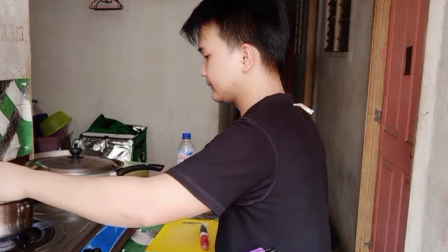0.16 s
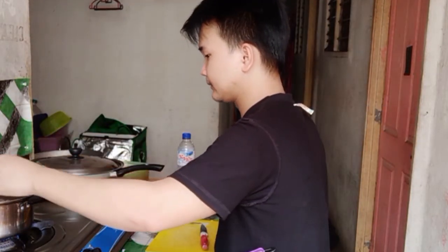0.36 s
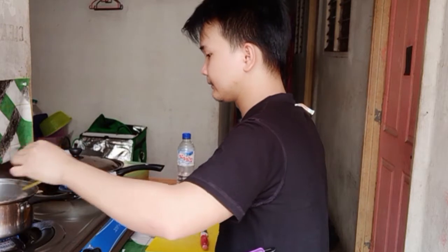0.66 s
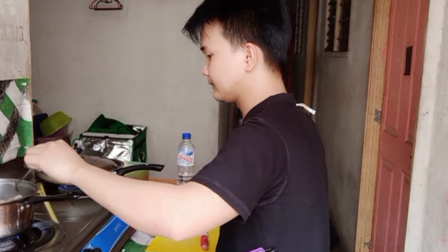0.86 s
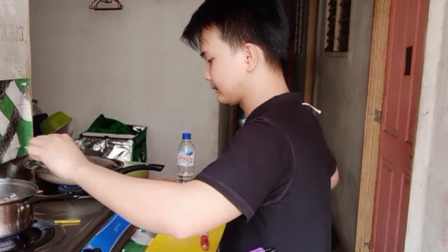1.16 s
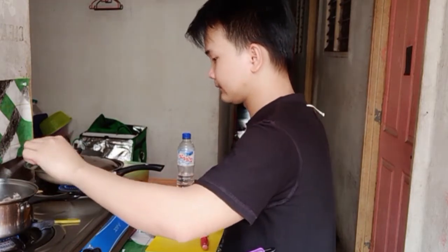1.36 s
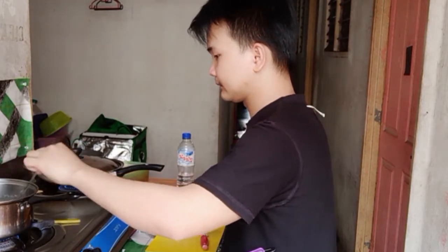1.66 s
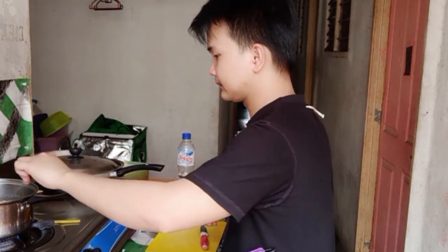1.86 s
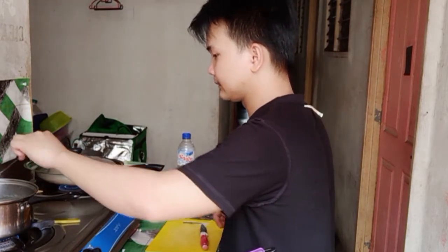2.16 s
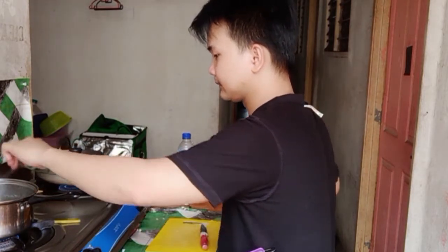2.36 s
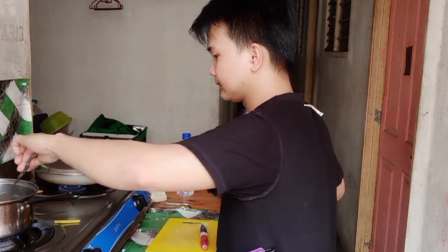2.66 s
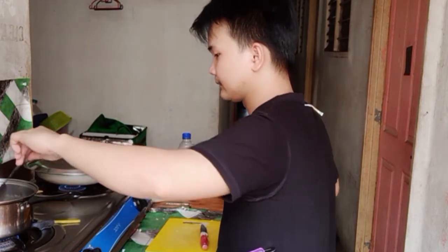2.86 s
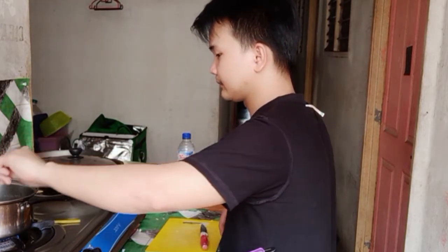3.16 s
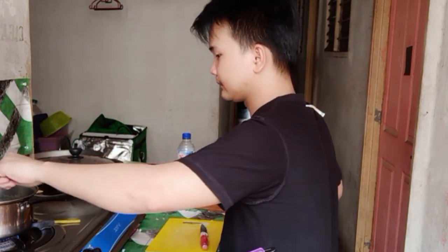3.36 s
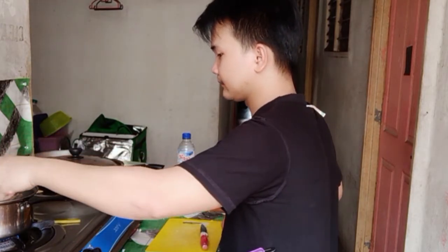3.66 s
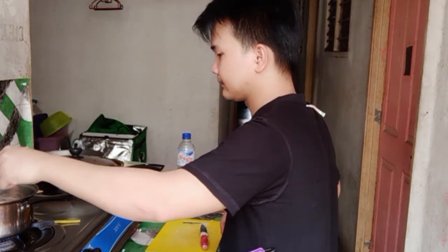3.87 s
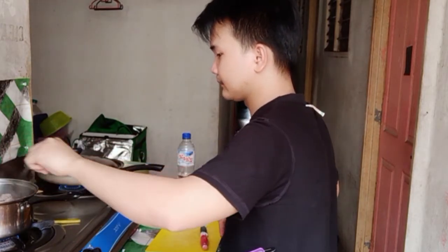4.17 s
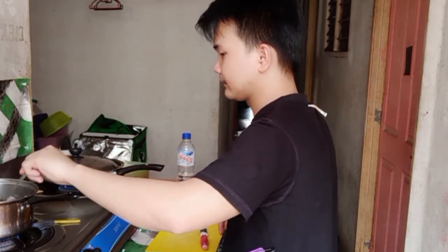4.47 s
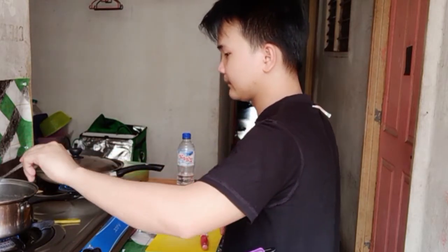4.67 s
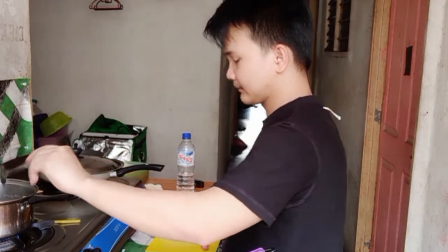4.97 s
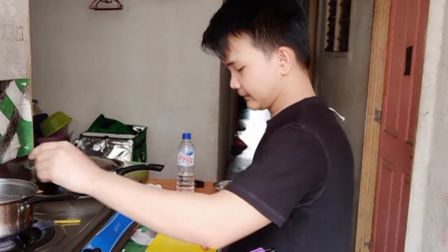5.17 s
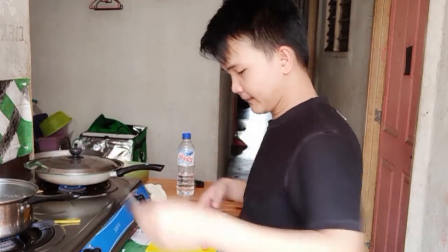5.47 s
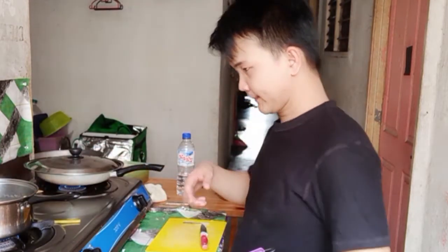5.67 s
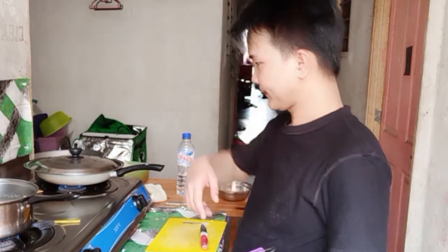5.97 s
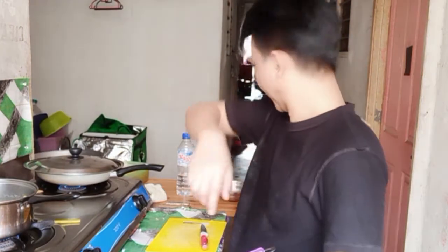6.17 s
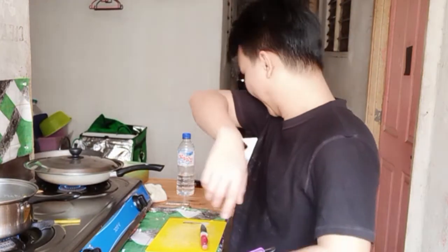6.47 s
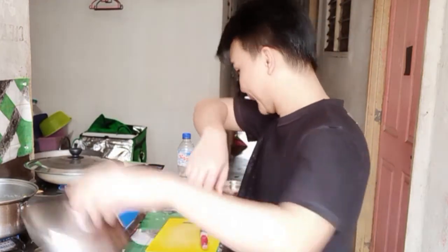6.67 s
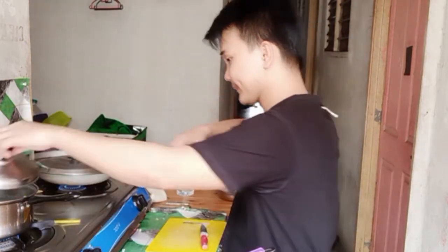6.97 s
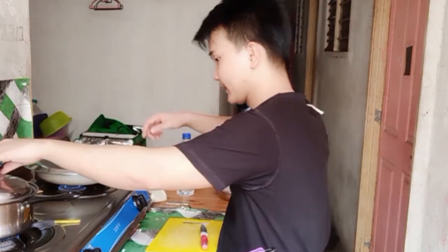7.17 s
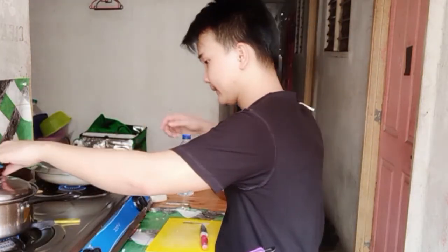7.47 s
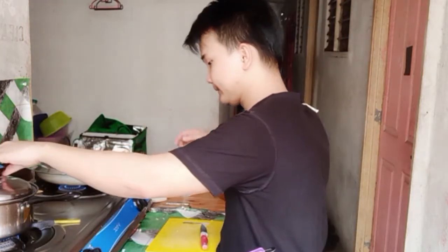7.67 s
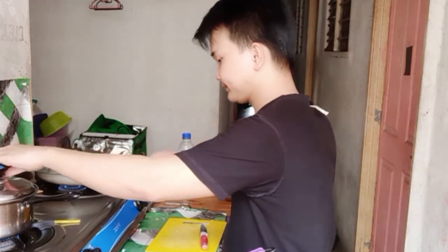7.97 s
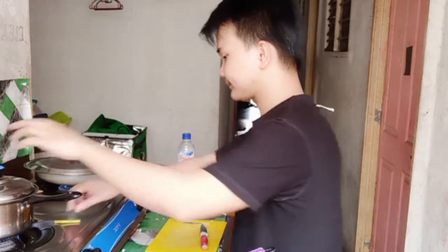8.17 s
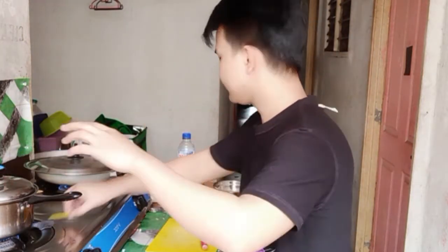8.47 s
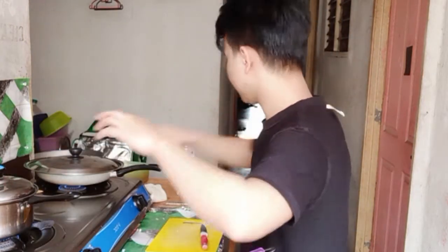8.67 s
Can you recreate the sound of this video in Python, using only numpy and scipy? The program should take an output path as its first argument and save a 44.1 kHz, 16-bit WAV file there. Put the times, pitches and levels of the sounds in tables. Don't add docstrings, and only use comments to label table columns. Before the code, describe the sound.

A thin, high simmering hiss runs throughout, swelling slightly with stirring, above low room noise and a faint breathy burner tone that comes and goes. Small ticks and barely audible footfalls open the scene, with a clearer tick at 0.7 s. Steel tongs clink at 2.0 s with softer touches after. A pot rim is knocked at 2.85 s, scraped hard at 3.0 s, and rattles to rest by 3.25 s. A quiet stretch holds a tick at 4.0 s and a tiny squeak. At 5.35 s a metal bowl lands, then clangs and rebounds loudly from 5.43 to 5.65 s, followed by a faint shelf hum. Footfalls grow firmer. At 6.9 s a lid touches, rocks hollowly and slides; a soft rub follows, then it drops shut at 7.5 s with a pot thud. A last nudge thuds at 8.0 s; simmering continues. The small, hard room is heard through a noise-suppressing mono phone, tails cut short.

```python
import sys
import numpy as np
from scipy import signal
from scipy.fft import rfft, irfft, next_fast_len
from scipy.io import wavfile
from scipy.ndimage import uniform_filter1d

SR = 44100
rng = np.random.default_rng(int(sys.argv[2]) if len(sys.argv) > 2 else 0)


def wrap_up_sound(samples):
    columns = np.atleast_2d(samples).T
    tamed = np.clip(columns, -1, 1)
    steps = np.round(tamed * 32767).astype(np.int16)
    wavfile.write(sys.argv[1], SR, steps)


def natural_amplitude(level_db):
    exponent = np.asarray(level_db, float) / 20
    return 10 ** exponent


N = 389403


def level(x, db):
    return x * natural_amplitude(db) / np.sqrt(np.mean(x ** 2))


def colour(x, points):
    hz, db = np.transpose(points)
    n = next_fast_len(len(x))
    f = np.log(np.fft.rfftfreq(n, 1 / SR) + 1)
    outside = np.maximum(np.log(hz[0]) - f, 0) + np.maximum(f - np.log(hz[-1]), 0)
    gain = natural_amplitude(np.interp(f, np.log(hz), db) - 40 * outside)
    return irfft(rfft(x, n) * gain, n)[:len(x)]


def band(hz, width):
    n = next_fast_len(N)
    f = np.fft.rfftfreq(n, 1 / SR)
    resonance = 1 / (1 + ((f - hz) / (width / 2)) ** 2)
    return level(irfft(rfft(rng.standard_normal(n)) * resonance, n)[:N], 0)


def patchy(x, spread_db, span_s, span_hz, calm_hz=9500):
    hz, _, z = signal.stft(x, SR, nperseg=1024)
    size = (max(int(span_hz * 1024 / SR), 1), max(int(span_s * SR / 512), 1))
    field = rng.standard_normal(z.shape)
    for axis in (0, 1, 0, 1):
        field = uniform_filter1d(field, size[axis], axis=axis)
    depth_db = spread_db / (1 + (hz[:, None] / calm_hz) ** 4)
    y = signal.istft(z * natural_amplitude(depth_db * field / field.std()), nperseg=1024)[1][:N]
    return level(y, 0) * np.sqrt(np.mean(x ** 2))


def bumps(start, hold, rise, fall):
    t = np.arange(N * 1000 // SR + 2) / 1000 - np.asarray(start)[:, None]
    early = np.minimum(t, 0) / rise
    late = np.maximum(t - np.reshape(hold, (-1, 1)), 0) / np.reshape(fall, (-1, 1))
    return np.exp(-early ** 2 - late ** 2)


def per_sample(curve):
    return np.interp(np.arange(N) / SR * 1000, np.arange(len(curve)), curve)


# blow_t60_s, tail_t60_s, tail_db, lift_db (around each mode), muffle_db_per_s2
CRASH_DECAY = dict(tongs=(.07, .5, -5, 4, 30), rim=(.08, .55, -4, 4, 30), pot=(.12, .55, -3, 3, 30),
               base=(.1, .4, -2, 3, 30), bowl=(.15, .68, 0, 2, 100), lid=(.1, .45, -3, 4, 30),
               dome=(.08, .24, -1, 2, 30), slide=(.12, .45, -2, 4, 30), shut=(.12, .42, -3, 3, 30),
               stove=(.12, .34, -1, 2, 30), shelf=(.05, .1, -3, 1, 5), tick=(.06, .17, -3, 1, 30),
               squeak=(.06, .14, -3, 1, 30), rub=(.08, .18, -3, 1, 30))


def strike(contacts, modes, crash, name, longest_s=0.38, flutter_db=5.0):
    span = 2 ** 15
    out = np.zeros(N + span)
    t, f = np.arange(span) / SR, np.fft.rfftfreq(span, 1 / SR)
    hz, db, t60 = np.transpose(modes)[:, :, None]
    blow_t60, tail_t60, tail_db, lift_db, muffle = CRASH_DECAY[name]

    thicket = uniform_filter1d(rng.standard_normal(len(f)), 25)
    crowd = np.max(np.exp(-((f - hz) / (0.025 * hz + 30)) ** 2), axis=0)
    thicket = natural_amplitude(4.0 * thicket / thicket.std() + lift_db * crowd)
    treble = 1 / (1 + (9000 / (f + 1)) ** 4)
    start = rng.random((len(modes), 1))

    for s, peak_db, rise, chatter, ring_db in contacts:
        after = np.maximum(t - rise - chatter, 0)
        muffled = natural_amplitude(-muffle * after ** 2)
        attack = np.clip(t / max(rise, 1e-4), 0, 1) ** 2 * muffled

        knots = t[::600]
        flutter = np.array([np.interp(t, knots, rng.standard_normal(len(knots))) for _ in modes])
        decay_db = -60 * after / np.clip(t60, .03, longest_s)
        turns = hz * (t + int(s * SR) / SR) + start
        lines = natural_amplitude(db + decay_db + flutter_db * flutter) * np.sin(2 * np.pi * turns)
        ring = attack * np.sum(lines, axis=0)

        noise = rfft(colour(rng.standard_normal(span), crash)) * thicket
        wash = np.zeros(span)
        for part, age in ((1 - treble, after), (treble, after / .95)):
            decay = natural_amplitude(-60 * age / blow_t60) + natural_amplitude(tail_db - 60 * age / tail_t60)
            wash += irfft(noise * part, span) * decay
        wash *= attack

        head = slice(0, int((rise + chatter + .02) * SR))
        sound = wash / wash[head].std() + natural_amplitude(ring_db) * ring / ring[head].std()
        first = int(s * SR)
        out[first:first + span] += natural_amplitude(peak_db) * sound / sound[head].std()
    return out[:N]


# start_s, lift_db, fall_s, crest_hz
SWELLS = [(0.04, 2.5, 0.2, 4300), (0.53, 2.5, 0.18, 5100), (0.73, 3, 0.15, 5600), (0.96, 3.5, 0.19, 4560),
          (1.64, 2.5, 0.24, 5740), (2.2, 3.5, 0.31, 4400), (3.2, 1.5, 0.21, 5800), (3.72, 3, 0.35, 5450),
          (4.63, 3.5, 0.19, 4500), (5.8, 2, 0.6, 5170), (7.3, 2, 0.6, 5800), (8.35, 1.5, 0.089, 4740)]
# pitch_hz, level_db
SIMMER_EDGE = [(3700, -24), (4150, -6), (4350, 0), (7300, 0), (7900, -8)]


def simmer():
    rest_db, rest_hz = -53.5, 5780
    s, lift_db, fall, swell_hz = np.transpose(SWELLS)
    stir = bumps(s, 0, 0.097, fall)
    simmer_db = per_sample(rest_db + np.max(lift_db[:, None] * stir, axis=0))
    crest_hz = per_sample((0.15 * rest_hz + swell_hz @ stir) / (0.15 + stir.sum(axis=0)))

    broad = colour(rng.standard_normal(N), [(3700, 4), (4500, -5.0), (6200, -1), (7300, -6.0),
                                            (8000, -15.5), (9800, -52.0)])
    crest = sum(band(hz, 300) * np.exp(-((crest_hz - hz) / 600) ** 2) for hz in range(4200, 7000, 250))
    swell = natural_amplitude(1.8 * (simmer_db - simmer_db.max()))
    hiss = colour(level(broad, 2.2) + level(crest, -0.6) * swell, SIMMER_EDGE)
    spray = level(colour(rng.standard_normal(N), [(7600, -3), (8500, 0), (9500, -7), (10300, -22)]), -20)
    return natural_amplitude(simmer_db) * (patchy(hiss, 2.24, .06, 200) + patchy(spray, 6.0, .07, 150, calm_hz=14000))


# start_s, length_s, level_db
WHISTLE = [(0.0, 0.53, -71), (0.632, 0.23, -59.5), (0.96, 0.08, -71), (1.268, 0.13, -66.5),
           (1.59, 0.06, -67), (1.762, 0.18, -66), (2.384, 0.44, -69.5), (3.44, 0.49, -67),
           (4.25, 0.049, -59.5), (4.422, 0.053, -61), (4.56, 0.59, -68.5), (5.317, 0.42, -68),
           (5.93, 0.45, -61.5), (6.546, 0.31, -64), (6.9, 0.39, -63.5), (7.443, 0.28, -59),
           (7.806, 0.4, -64.5), (8.507, 0.12, -68.5), (8.787, 0.1, -71)]


def burner():
    s, hold, tone_db = np.transpose(WHISTLE)
    edge_s, rest_db = 0.021, -90.5
    tone = per_sample(natural_amplitude(rest_db) + natural_amplitude(tone_db) @ bumps(s, hold, edge_s, edge_s))
    return patchy(band(993.7, 69), 1.9, .06, 100) * tone


# pitch_hz, level_db (per Hz)
KITCHEN = [(25, -22.5), (124, -6), (217, -10), (373, -4), (554, -11), (857, -13), (971, -10), (1120, -8.5),
           (1900, -11.5), (2550, -15), (3100, -8), (3600, -10), (4200, -10)]


def kitchen_air():
    air = level(colour(rng.standard_normal(N), KITCHEN), -59.5)
    return patchy(air, 5.58, 0.074, 100)


# pitch_hz, level_db (per Hz)
SELF_NOISE = [(6000, 8.5), (9000, 1), (10500, -5.5), (12000, -2.5), (15500, -2)]


def self_noise():
    own = level(colour(rng.standard_normal(N), SELF_NOISE), -69)
    return patchy(own, 2.0, .03, 1500, calm_hz=18000)


# start_s, peak_db
TICKS = [
    (0.2129, -59),
    (0.6674, -42),
    (0.93, -50),
    (4.018, -45),
    (8.0147, -44),
    (8.6994, -51),
]
# pitch_hz, level_db (per Hz)
TICK_CRASH = [(2000, -9), (8000, 12), (12000, -1), (15500, 7)]
# pitch_hz, level_db, t60_s
SHELF_MODES = [(2140, 0, 1.5), (2152, 20, 1.5)]


def small_ticks():
    rise_s, chatter_s, ring_db = 0.003, 0.014, -32
    contacts = [(s, db, rise_s, chatter_s, ring_db) for s, db in TICKS]
    return natural_amplitude(-22.0) * strike(contacts, SHELF_MODES, TICK_CRASH, "tick")


# start_s, peak_db
STEPS = [(0.52, -64), (0.84, -54), (1.38, -57), (2.58, -88), (2.89, -65), (3.04, -58), (3.73, -53),
         (4.14, -58), (5.58, -41.5), (6.17, -47.5), (6.41, -39.5), (6.68, -48.5), (6.78, -53.5),
         (6.92, -41), (6.98, -47), (7.12, -57), (7.31, -49), (7.55, -37), (7.63, -39.5), (7.81, -46.5),
         (8.04, -60), (8.13, -45), (8.24, -57), (8.55, -53), (8.65, -61), (8.82, -53)]
# pitch_hz, width_hz, level_db
FLOOR_MODES = [(105, 20, -2.5), (151.4, 34, -5)]


def steps():
    boom = sum(natural_amplitude(db) * band(hz, width) for hz, width, db in FLOOR_MODES)
    s, peak_db = np.transpose(STEPS)
    rest_db, rise_s, fall_s = -65.5, 0.035, 0.043
    return level(boom, -7.0) * per_sample(natural_amplitude(rest_db) + natural_amplitude(peak_db) @ bumps(s, 0, rise_s, fall_s))


# start_s, peak_db, rise_s, chatter_s, ring_db (share)
TONG_TAPS = [
    (1.9945, -27, 0.0024, 0.016, -3.5),
    (2.072, -36.5, 0.0058, 0.015, -14),
    (2.102, -42, .003, .01, -14),
]
# pitch_hz, width_hz, level_db
TONG_MODES = [(2710, 13, -9), (3900, 40, -5), (5370, 33, -7), (6210, 39, 2), (6790, 24, -7), (7490, 67, -9),
              (8600, 60, -9), (10700, 30, -20), (11500, 50, -15), (12200, 59, -14), (13500, 47, -17),
              (15100, 40, -22)]
# pitch_hz, level_db (per Hz)
TONG_CRASH = [(500, -12), (737, -3), (1400, -9), (2390, -15), (2690, -25), (2930, -7), (6090, 3),
              (8480, -4), (15500, -19.5)]


def tongs():
    modes = [(hz, db, 2.2 * 3 / max(width, 10)) for hz, width, db in TONG_MODES]
    return strike(TONG_TAPS, modes, TONG_CRASH, "tongs")


RIM_TAPS = [
    (2.8435, -23, 0.0025, 0.0045, -3),
]
# pitch_hz, level_db, t60_s
RIM_MODES = [(574, -30, 0.5), (895, -12, 0.27), (1604, -20, .16), (2745, -7, 0.15), (3600, -2, 0.16),
             (4000, 0, 0.15), (5500, -1, 0.084), (6330, -3, 0.15), (6702, -10, .18), (8130, -5, .18),
             (13500, -19, .1), (14100, -18, .1)]
RIM_CRASH = [(150, -2), (320, -30), (550, -24), (900, -4.5), (1500, -18), (2300, -15), (3100, -7),
             (3800, -2), (4700, -2.5), (6400, -0.5), (9000, -10), (15500, -21)]


def rim_tap():
    return strike(RIM_TAPS, RIM_MODES, RIM_CRASH, "rim")


LOW_KNOCKS = [
    (2.862, -44.5, 0.0085, 0.036, -16),
    (5.445, -45, 0.0061, 0.049, 0),
    (5.62, -52, .02, .1, -12),
    (6.962, -28, 0.007, 0.004, -2),
    (7.005, -38, .004, .008, -4),
    (7.025, -37, 0.008, 0.011, -9),
    (7.058, -38, 0.0045, 0.0092, -4),
    (7.09, -40.5, 0.012, 0.012, 0.1),
    (7.17, -45.5, 0.012, 0.018, -10),
]
DOME_MODES = [(370, 3, 0.054), (469, 2, 0.026), (569, 6, 0.17), (730, -5, 0.18), (926, 0, .1)]
DOME_CRASH = [(150, -41), (300, 4), (420, 12), (550, 12), (1100, -9), (1600, -10), (2500, -17)]


def low_knock():
    return strike(LOW_KNOCKS, DOME_MODES, DOME_CRASH, "dome")


RIM_SCRAPES = [
    (2.965, -44, .028, .002, -14),
    (2.995, -20.5, 0.002, 0.012, -9),
    (3.08, -40, .03, .04, -14),
]
POT_MODES = [(315, -20, 0.42), (980, -12, 0.4), (1906, -14, .15), (3160, -10, 0.33), (3440, -4, .2),
             (4010, -2, 0.2), (4310, -4, .15), (5510, -5, .2), (5744, -6, 0.34), (6105, -3, 0.25),
             (6800, 0, 0.2), (8790, -7, .2), (9540, -8, .15), (11500, -16, .15)]
POT_CRASH = [(150, -20), (285, -2), (708, -8), (1020, -5), (2180, -10), (3350, 0), (6860, 1.5),
             (15500, -21.5)]


def rim_scrape():
    return strike(RIM_SCRAPES, POT_MODES, POT_CRASH, "pot")


RIM_RATTLE = [
    (3.15, -34, .02, .02, -6),
    (3.2, -39, 0.01, 0.02, -10),
    (3.232, -38, .008, .015, -6),
]
RATTLE_MODES = [(1200, -20, .2), (4010, -10, .15), (5744, -4, .3), (6105, 0, .25), (7600, -8, .2),
                (8790, -8, .2)]
RATTLE_CRASH = [(500, -14), (1000, -14), (2300, -18), (4200, -7), (6100, 2), (8500, -4), (15500, -18)]


def rim_rattle():
    return strike(RIM_RATTLE, RATTLE_MODES, RATTLE_CRASH, "pot")


SQUEAK = [
    (4.24, -66, .015, .04, -40),
    (6.155, -68, .02, .01, -40),
    (7.875, -57, 0.0072, 0.016, -40),
]
SQUEAK_CRASH = [(12000, -14), (14000, -4), (15500, -4)]


def squeak():
    return natural_amplitude(-4) * strike(SQUEAK, SHELF_MODES, SQUEAK_CRASH, "squeak")


BOWL_SET = [
    (5.3335, -16.5, 0.0022, 0.012, -4),
]
BASE_MODES = [(345, -14, .12), (668, -16, .13), (977, -7, .13), (1485, -9, .24), (1723, -4, .23),
              (2137, -8, .33), (2277, -4, .21), (3203, -5, .11), (3548, -9, .2), (3967, -3, .08),
              (6320, -6, .07), (6751, 0, .1), (8349, -3, .1), (14500, -10, .14)]
BASE_CRASH = [(250, -37), (341, -31), (1180, -10), (1700, -9), (2200, -4), (2850, -11), (6100, -6),
              (15500, -25)]


def bowl_set_down():
    return strike(BOWL_SET, BASE_MODES, BASE_CRASH, "base")


BOWL_CLANG = [
    (5.4305, -13, 0.0012, 0.008, -11),
    (5.441, -14, 0.003, 0.012, -5),
    (5.462, -18, .002, .01, -5),
    (5.481, -15, 0.001, 0.01, -2),
    (5.505, -19, .002, .01, -6),
    (5.526, -16, 0.0025, 0.016, -8),
    (5.575, -28, 0.002, 0.015, -10),
    (5.605, -27, .002, .015, -10),
    (5.632, -27, .002, .015, -10),
]
BOWL_HZ = [1523, 2137, 2622, 3098, 3413, 3747, 3971, 4324, 5062, 5100, 5308, 5412, 6136, 6165, 6213, 6281,
           6568, 6752, 7224, 7700, 8035, 8581, 9006, 9895, 10304, 11495, 13108, 14443, 14729]
# level_db, t60_s
BOWL_MODES = [(-16, 0.5), (-15, 0.4), (-13, 0.6), (-12, .6), (-20, 0.5), (-21, 0.57), (-8, 0.65), (3, .45),
              (-11, .8), (-11, .8), (-14, .6), (-12, .6), (-8, .4), (-8, .4), (-7, 0.5), (-4, 0.55),
              (-9, 0.6), (-9, 0.6), (-14, .4), (-10, .2), (-13, .6), (-16, .5), (-20, .4), (-21, .4),
              (-20, .4), (-18, 0.25), (-24, .3), (-25, .25), (-27, .25)]
BOWL_CRASH = [(250, -31), (550, -26), (800, -17), (1500, -10.5), (2300, -8), (4200, -6), (6300, -1),
              (8300, -6.5), (10000, -15.5), (13000, -16.5), (14500, -16.5), (15500, -20)]


def bowl_clang():
    modes = np.column_stack([BOWL_HZ, BOWL_MODES])
    return strike(BOWL_CLANG, modes, BOWL_CRASH, "bowl", longest_s=0.8, flutter_db=4.0)


SHELF_RING = [
    (5.68, -66, 0.08, .01, 24),
]


def shelf_ring():
    return strike(SHELF_RING, SHELF_MODES, DOME_CRASH, "shelf", longest_s=1.26, flutter_db=6.0)


LID_TOUCH = [
    (6.8715, -26, 0.003, 0.006, -9),
    (6.879, -27, .002, .005, -6),
]
LID_MODES = [(830, 1, 0.2), (1389, -3, 0.2), (3187, -6, 0.2), (3327, -6, .16), (3950, -8, .2),
             (5410, -4, .07), (6438, -2, 0.5), (7224, -5, 0.15), (7763, -11, 0.33), (8586, -7, 0.2),
             (9500, -7, 0.16), (11700, -12, 0.11), (12550, -14.5, 0.25), (14070, -10, 0.1)]
LID_CRASH = [(250, -32), (341, -10.5), (809, -1), (1180, -15), (1410, -19), (2620, -23.5), (3220, -9.5),
             (4470, -21), (6310, -12.5), (15500, -30)]


def lid_touch():
    return strike(LID_TOUCH, LID_MODES, LID_CRASH, "lid")


LID_SLIDES = [
    (6.955, -44, .01, .03, -12),
    (7.005, -37, 0.013, 0.02, -12),
    (7.022, -32, .008, .035, -10),
    (7.075, -40, .005, .02, -12),
    (7.47, -32.5, 0.037, 0.0045, -14),
]
SLIDE_CRASH = [(1500, -16), (2800, -14), (4000, -5), (5300, -11), (6500, 1.5), (8100, -5.5), (15500, -20)]


def lid_slide():
    return strike(LID_SLIDES, LID_MODES[2:], SLIDE_CRASH, "slide")


RUB = [
    (7.27, -58, 0.059, 0.21, -40),
]
RUB_CRASH = [(620, 3.5), (900, -9), (1500, 3), (3000, -10.5), (9000, -10.5), (12000, -29)]


def rub():
    return strike(RUB, SHELF_MODES, RUB_CRASH, "rub")


LID_SHUT = [
    (7.5165, -20, 0.002, 0.012, -8),
    (7.543, -28, .002, .006, -8),
]
SHUT_MODES = [(1190, -12, .3), (2210, -1, .2), (3135, -3, .3), (3810, -4, .1), (3962, -4, .36),
              (4619, -5, .08), (5650, -4, .15), (6250, 0, .2), (6700, -3, .19), (7755, -7, .3),
              (8339, -9, .35), (9240, -11, .15), (11300, -19, .15), (14100, -21, .12)]
SHUT_CRASH = [(470, 2), (800, 2), (1500, 0), (2180, 2), (2500, -3), (3210, 2), (4370, 1), (6040, 7.5),
              (15500, -19)]


def lid_shut():
    return strike(LID_SHUT, SHUT_MODES, SHUT_CRASH, "shut")


POT_THUDS = [
    (7.532, -29, 0.0064, 0.0093, -1.5),
    (7.6, -45, 0.018, 0.05, -20),
    (8.012, -36.5, 0.022, 0.027, -3.5),
    (8.115, -52, 0.012, 0.016, -13),
]
STOVE_MODES = [(124.2, 7.5, .4), (271, 2, 0.086), (381.4, 7, 0.046), (543, -2, 0.12), (720, -5.5, .2)]
STOVE_CRASH = [(60, -37), (130, -14), (400, -0.5), (700, -8), (1300, -15), (2500, -20)]


def pot_thud():
    return strike(POT_THUDS, STOVE_MODES, STOVE_CRASH, "stove")


def room(x):
    t = np.arange(SR) / SR
    t60_s, dull_hz, echo_db = .45, 5330, -13
    tail = rng.standard_normal(SR) * natural_amplitude(-60 * t / t60_s) * np.clip(t / 0.0015, 0, 1)
    tail = signal.lfilter(*signal.butter(1, dull_hz, fs=SR), tail)
    tail /= np.sqrt(np.sum(tail ** 2))
    return x + natural_amplitude(echo_db) * signal.fftconvolve(x, tail)[:N]


def gate(x, bed):
    gate_db, memory_s, memory_db, duck_db = -89, .16, -15, -1.5
    z = signal.stft(x, nperseg=1024)[2]
    quiet = signal.stft(bed, nperseg=1024)[2]
    power = uniform_filter1d(uniform_filter1d(np.abs(z) ** 2, size=5, axis=0), size=2, axis=1)
    keep = np.exp(-512 / (SR * memory_s))
    wide = uniform_filter1d(power, size=41, axis=0)
    memory = natural_amplitude(2 * memory_db) * signal.lfilter([0, 1 - keep], [1, -keep], wide)
    estimate = natural_amplitude(2 * gate_db) + memory
    loud = z * power ** 2 / (power ** 2 + estimate ** 2)
    ducked = quiet * natural_amplitude(duck_db * memory / estimate)
    return signal.istft(loud + ducked, nperseg=1024)[1][:N]


# pitch_hz, level_db
PORT = [(20, 3.5), (8000, 0), (10000, 2), (12000, 7), (14500, 10.5), (16000, 14), (22000, 3)]


def scene():
    background = simmer() + burner() + kitchen_air() + self_noise()
    clatter = (tongs() + rim_tap() + low_knock() + rim_scrape() + rim_rattle() + bowl_set_down()
               + bowl_clang() + lid_touch() + lid_slide() + lid_shut() + pot_thud())
    no_bass = signal.butter(3, 90, "high", fs=SR, output="sos")
    pots = signal.sosfilt(no_bass, colour(room(clatter), PORT))
    faint = small_ticks() + squeak() + rub()
    mono = gate(natural_amplitude(-11.0) * pots, background) + shelf_ring() + faint + steps()
    return np.array([mono, mono])


def band_limit(x):
    return signal.sosfilt(signal.butter(12, 16820, fs=SR, output="sos"), x)


def record(dry):
    top_hz, leak_db = 15560, -35
    n = next_fast_len(N)
    f = np.fft.rfftfreq(n, 1 / SR)
    mix = irfft(rfft(dry, n) * np.where(f < top_hz, 1, natural_amplitude(leak_db)), n)[:, :N]
    return band_limit(mix)


dry = scene()
out = record(dry)
wrap_up_sound(out)
```